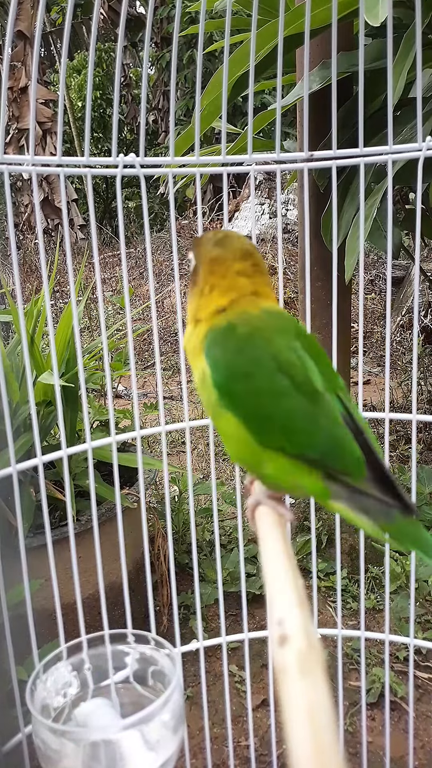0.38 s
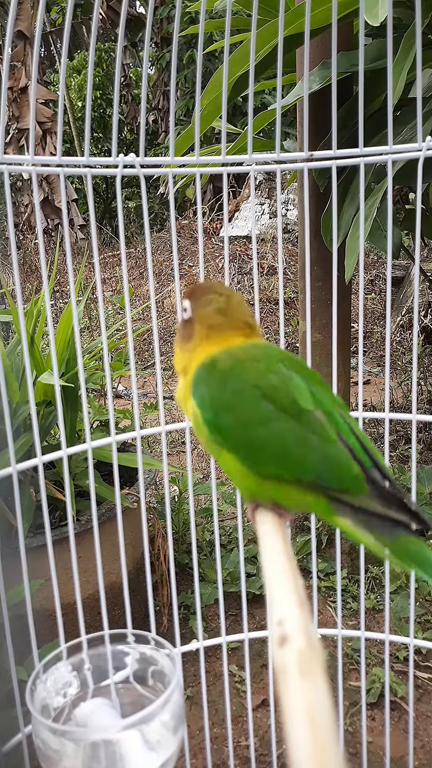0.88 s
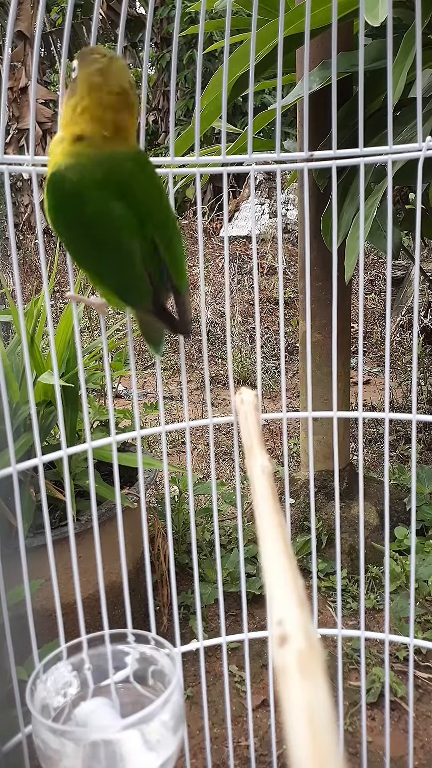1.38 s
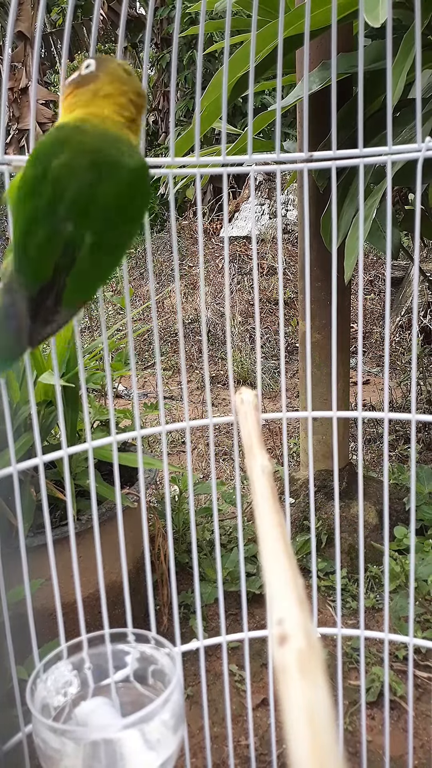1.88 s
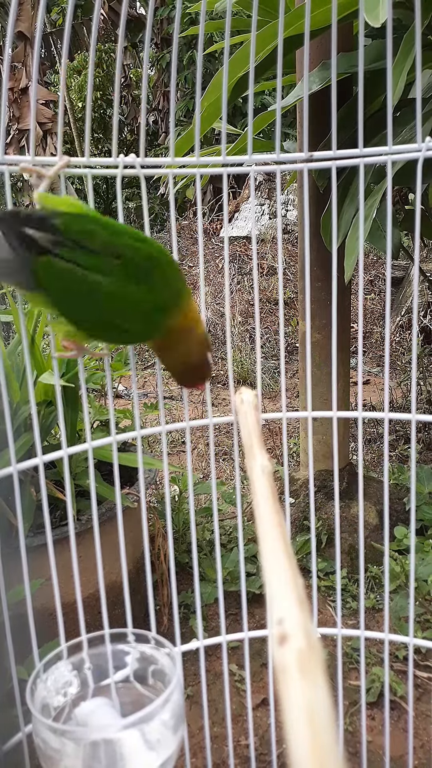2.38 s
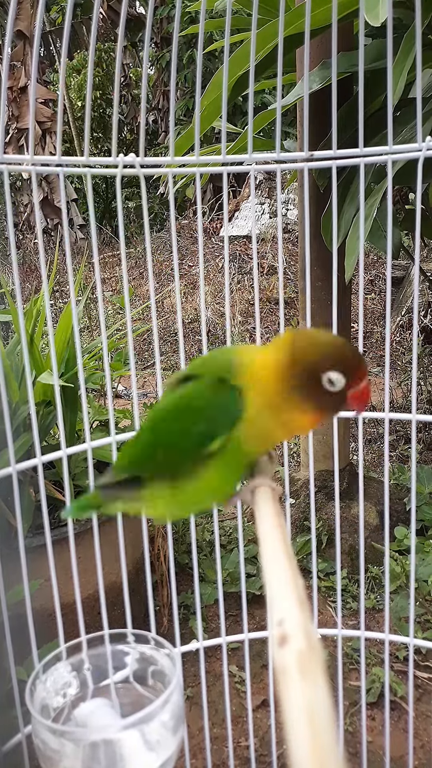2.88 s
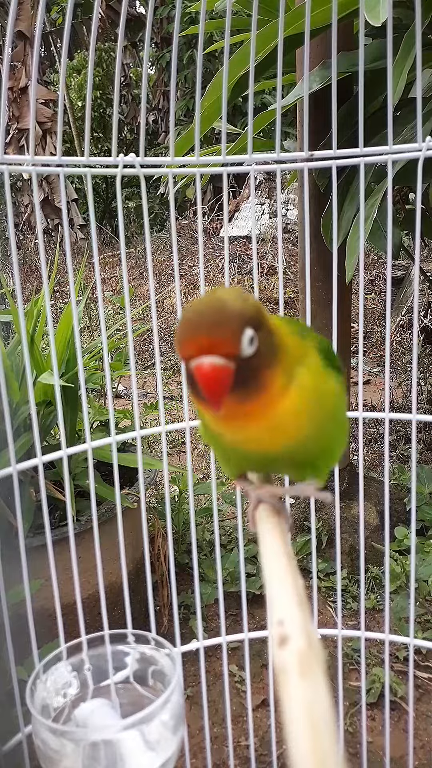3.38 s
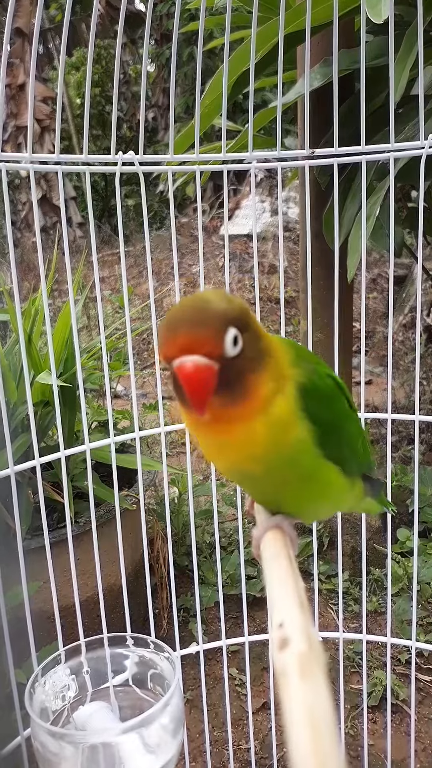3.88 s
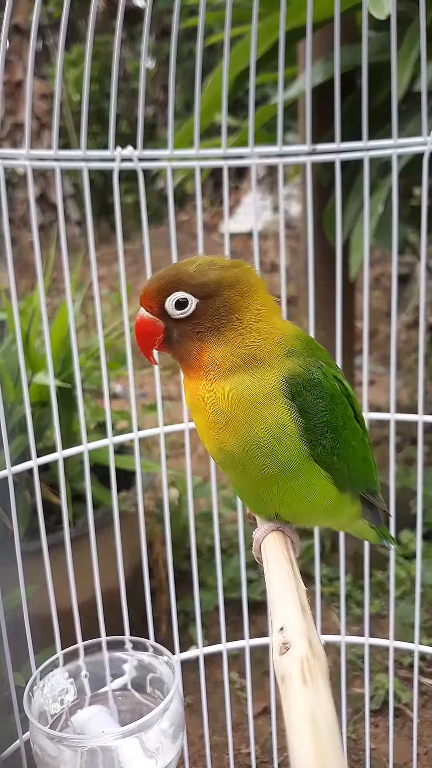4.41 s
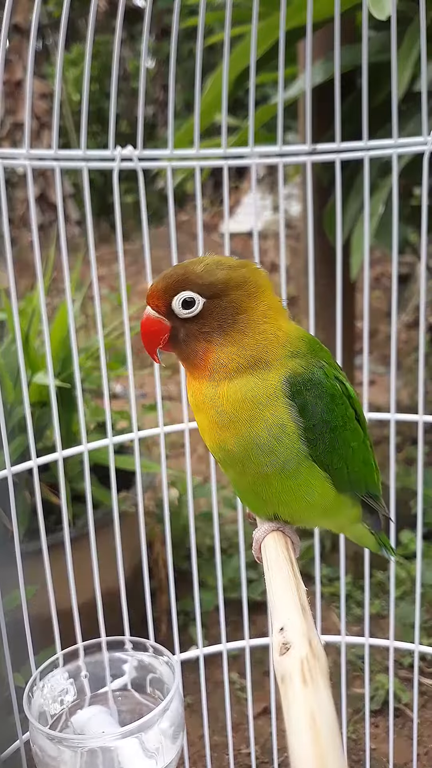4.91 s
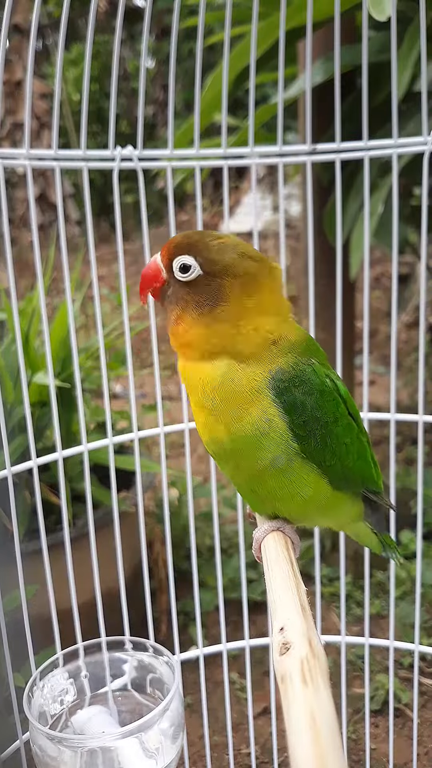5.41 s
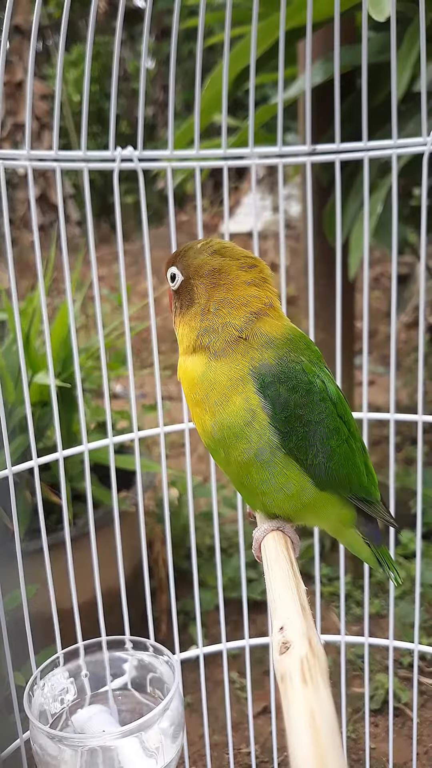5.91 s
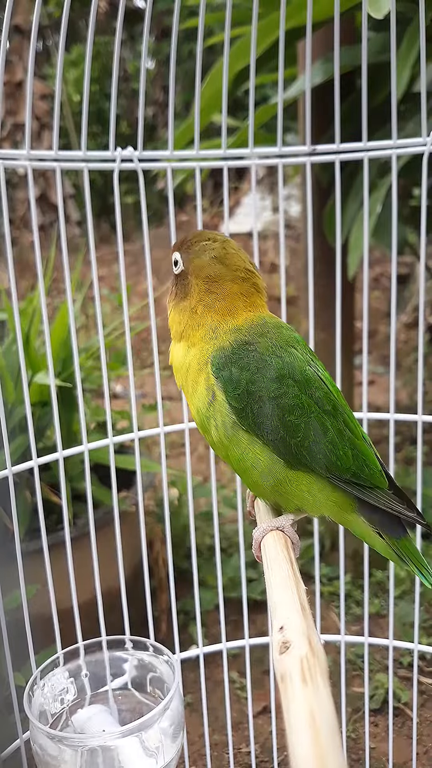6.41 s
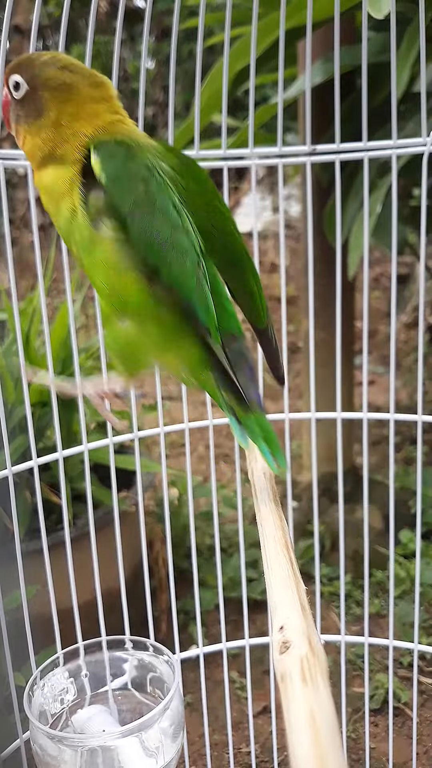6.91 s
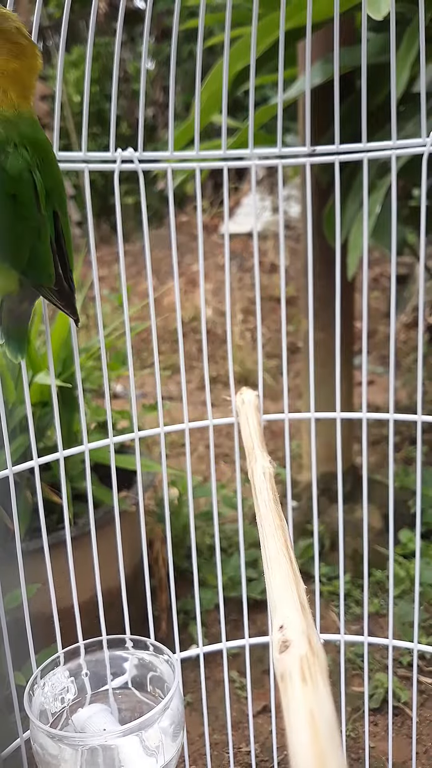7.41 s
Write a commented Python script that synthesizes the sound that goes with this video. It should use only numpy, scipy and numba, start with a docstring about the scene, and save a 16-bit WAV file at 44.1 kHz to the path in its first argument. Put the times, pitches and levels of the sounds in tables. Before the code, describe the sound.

An outdoor garden, heard through a close phone microphone: low rumble, soft leaf hiss, thin insect shimmer and faint, echoing distant birds run throughout, swelling at times. A slight claw scratch comes at 0.3 seconds. From 1.1 to 1.6 a nearby lovebird fires off loud, shrill, sliding chirps, some raspy, as its jump rattles the cage wire. Scrabbling and small metallic taps continue until about 2.3. At 2.8 a sharper scrape and wire clank lead into another quick chirp burst, ending near 3.3. Crisp, dry beak clicks snap irregularly from 3.6 to 4.5. Distant birds grow clearer around 4.8 to 5.3, and a faint low whistle wavers from 5 to 6. Piercing chirps return at 5.4, trailing into weaker, echoing notes until 5.9. After a quieter pause, a wire rattle and final shrill chirps burst out from 7.0 to 7.4.

```python
"""Rumble, leaf hiss, filtered-noise insects and far gliding sine whistles run throughout, swelling at times.
Claws scrabble from 0.26 s: noise bursts ring the cage wire. A near lovebird chirps from 1.1 s and 2.9 s
in gliding, rough partial stacks, with taps on the wire between. Beak clicks follow from 3.6 s: noise snaps
with a resonance. A low whistle wavers from 5 s; chirps return at 5.4 s and 7 s. The yard echoes the near
sounds; the close phone limits and clips the loudest."""
import sys
import numpy as np
from scipy import signal
from scipy.fft import rfft, irfft, next_fast_len
from scipy.io import wavfile
from scipy.ndimage import uniform_filter1d
from numba import njit

SR = 44100
rng = np.random.default_rng(int(sys.argv[2]) if len(sys.argv) > 2 else 0)


def invert_db(level):
    """Linear amplitude ratio for a level in decibels (20 dB per decade), elementwise."""
    return 10 ** (np.asarray(level, dtype=float) / 20)


def log_audio(samples):
    """Write samples as a 16-bit WAV file to the path given in sys.argv[1]."""
    # one column per channel
    frames = np.atleast_2d(samples).T
    # limit to full scale, then quantise
    limited = np.clip(frames, -1, 1)
    pcm = np.round(limited * 32767).astype(np.int16)
    wavfile.write(sys.argv[1], SR, pcm)


N = 332514

# Background swells: (time [s], rumble rms [dB], hiss and insect reference [dB])
SWELLS = [(0, -56, -71), (0.5, -54.5, -70), (1.09, -43.5, -59), (1.3, -46.5, -58), (1.62, -40, -59),
          (2.0, -39.5, -54), (2.3, -41, -59), (2.771, -35, -54.5), (3.029, -50, -66.5),
          (3.55, -45.5, -64.5), (4.1, -50.5, -64), (4.45, -41, -55), (5.39, -39, -54), (5.68, -50, -65.5),
          (6.5, -52.5, -69), (6.8, -50, -61.5), (6.97, -38, -54), (7.15, -47, -58.5), (7.5, -51, -64)]
# Rumble spectrum: (frequency [Hz], relative density [dB per Hz])
RUMBLE_SPECTRUM = [(15, -67.5), (25, -26.5), (97, 4.5), (197, -8.5), (249, -8), (287, -11.5), (700, -44.5),
                   (910, -54.5), (1540, -120)]
# Air hiss spectrum: (frequency [Hz], relative density [dB per Hz])
AIR_SPECTRUM = [(300, 1.5), (1300, -1.5), (2700, -7), (3100, 6.5), (5000, 4.5), (7000, 1.5), (9500, -12),
                (11300, -31.5), (13700, -8.5), (15600, -9)]
# Insect chorus bands: (centre [Hz], width [Hz], relative rms [dB])
INSECT_BANDS = [(3122, 170, 5.5), (6250, 87, -0.5), (12380, 1100, 1)]
# Far birds: (time [s], length [s], start pitch [Hz], end pitch [Hz], level ahead of direct/echo split [dB])
FAR_CHIRPS = [(0, 0.032, 6070, 5880, -45), (0.298, 0.071, 5670, 3860, -48), (0.332, 0.059, 4590, 4540, -51),
              (0.774, 0.14, 4590, 4740, -47.5), (1.926, 0.052, 4900, 4700, -43),
              (2.516, 0.093, 5660, 3930, -38.5), (3.456, 0.063, 4270, 4030, -46),
              (3.59, 0.12, 3960, 3930, -54), (3.55, 0.065, 5390, 6080, -49.5),
              (3.752, 0.058, 6250, 4250, -44.5), (3.864, 0.066, 7140, 6900, -50),
              (4.166, 0.048, 4300, 4290, -41.5), (4.431, 0.13, 6670, 3880, -38.5),
              (4.51, 0.037, 7100, 7100, -38.5), (4.834, 0.088, 4100, 4080, -34),
              (4.88, 0.075, 8660, 3940, -31.5), (5.097, .12, 8510, 3670, -33),
              (5.301, 0.091, 8250, 6170, -36), (6.157, 0.058, 5550, 3810, -42),
              (6.598, 0.11, 4430, 4750, -46.5), (6.66, 0.6, 6110, 6820, -43)]
# Far low whistles: (time [s], length [s], start level [dB], end level [dB])
FAR_WHISTLES = [(5.0, .45, -43.5, -46.5), (5.65, 0.39, -53, -70)]
# Whistle wavering: (rate [Hz], rms depth [dB])
WHISTLE_WAVER = (24, 3.5)
# Claws and wings on the bars: (time [s], length [s], scratch level [dB], relative bar drive [dB])
SCRABBLES = [(0.257, 0.049, -53.5, -67), (0.996, 0.057, -54.5, -56), (1.09, 0.079, -40, -34.5),
             (1.489, 0.14, -96.5, -35), (1.607, 0.12, -54, -43.5), (1.78, 0.1, -46, -40.5),
             (1.866, 0.1, -53.5, -40.5), (1.927, 0.057, -39.5, -51), (1.578, 0.56, -66, -48),
             (1.933, 0.42, -70, -57.5), (2.929, .45, -76, -49.5), (2.771, 0.11, -39.5, -54),
             (2.786, 0.069, -34.5, -49), (2.851, 0.042, -23.5, -54.5), (2.864, 0.054, -44, -25.5),
             (3.506, 0.023, -43.5, -68), (6.876, 0.035, -45, -60), (6.99, 0.058, -33, -33.5),
             (7.06, 0.19, -58.5, -52)]
# Cage bar resonances: (centre [Hz], width [Hz], gain [dB])
BAR_MODES = [(537, 22, 3.5), (860, 120, -8.5), (1070, 58, -13.5), (1360, 140, -14), (2050, 110, -14),
             (600, 340, -13)]
# Scratch resonances: (centre [Hz], width [Hz], relative gain [dB])
SCRATCH_MODES = [(3550, 670, 5.5), (5100, 550, 4), (7100, 940, 1), (7800, 730, -6), (14500, 4300, 0.5),
                 (5000, 6000, -13)]
# Single claw taps: (time [s], relative level [dB])
CLAW_TAPS = [(1.652, -42.5), (1.763, -41), (1.777, -42.5), (1.932, -41), (1.955, -45), (2.786, -42),
             (2.804, -28)]
# Wire modes under a tap: (frequency [Hz], relative mean level [dB], t60 [s])
WIRE_MODES = [(3600, -0.5, .05), (5200, -1.5, 0.051), (7300, -2, 0.045), (8300, -1.5, 0.058),
              (9200, -9, .04), (12200, -5, .06), (14900, -4, .04), (15300, -2.5, .06)]
# Beak clicks: (time [s], peak level [dB], added resonance [Hz])
BEAK_CLICKS = [(3.625, -29, 1990), (3.72, -8, 8500), (3.725, -17, 2500), (3.8154, -4.5, 4430),
               (3.9007, -11, 4160), (4.237, -6.5, 4200), (4.33, -1.5, 6640), (4.5157, -6, 2570)]
# Chirp notes, each a list of: (time [s], pitch [Hz], level of the stronger low partial before flutter [dB])
CHIRP_NOTES = [
    [(1.133, 5060, 9), (1.1355, 5434, -10.5), (1.139, 5320, -11)],
    [(1.139, 2328, 2), (1.143, 2796, -3), (1.147, 2843, -2.5), (1.151, 2880, 0), (1.156, 3190, -11)],
    [(1.219, 2172, -3.5), (1.2235, 2255, -12.5), (1.226, 2062, -22.5), (1.232, 2260, -1),
     (1.237, 2390, -14.5)],
    [(1.387, 3346, -10.5), (1.394, 4304, -16.5), (1.398, 5497, -16), (1.404, 6130, -17), (1.409, 5820, -5),
     (1.413, 4153, -5.5), (1.419, 3750, -11.5), (1.426, 3260, 4), (1.433, 3140, 0.5), (1.438, 4220, 8)],
    [(1.438, 4160, -8.5), (1.442, 3936, 1.5), (1.445, 6090, -11), (1.454, 5900, -7.5)],
    [(1.454, 5510, -5.5), (1.457, 4574, -6), (1.461, 4340, 7), (1.465, 4510, -27), (1.47, 4240, 3),
     (1.474, 4900, -4)],
    [(1.537, 2110, -25), (1.543, 2564, -35), (1.547, 2414, -21), (1.566, 1773, -22.5), (1.575, 1666, -18)],
    [(2.856, 3610, -18), (2.872, 2990, -33)],
    [(2.874, 2273, -9), (2.893, 2840, -16.5)],
    [(2.894, 3363, 2), (2.9, 3455, 0), (2.904, 4080, 1), (2.908, 5710, 1.5), (2.914, 6200, -4),
     (2.918, 3993, 2), (2.921, 3050, -5.5)],
    [(2.921, 2990, -4), (2.933, 2835, -6), (2.945, 2582, -11.5), (2.965, 2390, -4.5)],
    [(2.971, 3450, 1), (2.98, 3886, -1.5), (2.991, 3920, -3), (2.997, 4120, 0), (3.004, 4520, -9.5),
     (3.012, 4090, -5.5)],
    [(3.065, 1753, -23.5), (3.071, 1758, -16.5), (3.078, 3997, -6.5), (3.085, 4120, 3.5), (3.094, 3800, -2),
     (3.098, 3880, -16)],
    [(3.099, 6136, 0), (3.104, 5505, -3.5), (3.111, 4247, -1), (3.116, 4160, 1.5), (3.12, 4110, -14.5)],
    [(3.222, 2468, -23.5), (3.228, 2432, -15), (3.235, 2334, -18), (3.247, 1650, -12.5),
     (3.254, 1470, -18.5), (3.259, 1500, -27.5)],
    [(5.42, 2068, -6.5), (5.442, 3064, 4.5)],
    [(5.442, 3600, 1), (5.445, 3940, -2.5), (5.452, 3906, -5.5)],
    [(5.452, 2254, -13), (5.457, 2082, -4), (5.466, 2420, -1.5), (5.493, 2410, 1)],
    [(5.493, 2396, -2.5), (5.499, 6104, 2), (5.511, 6495, 5.5), (5.514, 5200, -1.5)],
    [(5.514, 5000, 6.5), (5.521, 3820, 3.5), (5.538, 3540, 0), (5.55, 3778, -2.5), (5.56, 3503, -7),
     (5.565, 2458, -7.5), (5.57, 2485, -17.5)],
    [(5.57, 2510, -9.5), (5.575, 3874, 0.5), (5.59, 4620, 8), (5.598, 4500, 1.5), (5.606, 5018, 0),
     (5.619, 5100, 0)],
    [(5.702, 2230, -26), (5.717, 2100, -24.5), (5.727, 2260, -17), (5.734, 2725, -22), (5.752, 2657, -19),
     (5.764, 2603, -16)],
    [(5.764, 3785, -13), (5.78, 3753, -24.5), (5.79, 3710, -14.5), (5.806, 3518, -18.5), (5.811, 2518, -16),
     (5.817, 3550, -21.5), (5.827, 3650, -17), (5.846, 4708, -15), (5.855, 4900, -13.5),
     (5.868, 4680, -13.5)],
    [(7.044, 3860, 0), (7.048, 4350, -3), (7.053, 5200, 7.5)],
    [(7.053, 5870, -3.5), (7.057, 6540, 4), (7.061, 6210, 4), (7.069, 5830, 7), (7.073, 5900, -22),
     (7.076, 5490, -3), (7.083, 5390, 1), (7.088, 5760, -9)],
    [(7.201, 2100, -35), (7.203, 2300, -25.5), (7.206, 2250, -40)],
    [(7.251, 1200, -19.5), (7.259, 1440, -23), (7.268, 1650, -24), (7.274, 1445, -11)],
    [(7.275, 2805, 1.5), (7.282, 2465, -20), (7.289, 2213, -6), (7.294, 2288, -6.5), (7.297, 3730, 0),
     (7.306, 5474, -11), (7.312, 5810, -14), (7.317, 5274, -8.5), (7.321, 4100, 4.5)],
    [(7.321, 4136, 3.5), (7.325, 2222, -27), (7.329, 1970, -14), (7.333, 2130, -13.5), (7.339, 4030, -5.5),
     (7.358, 4026, 5), (7.374, 3987, -5), (7.378, 3900, -7)],
]
# Colour of each note: (base roughness [0-1], brightness [dB], share thrown to the yard [dB]);
# more is thrown when the bird faces away
NOTE_COLOURS = [(.55, -17.5, -0.5), (0.7, 11.5, -2.5), (0.34, 11.5, 0.5), (0.1, -12.5, -4.5),
                (0.6, -11, -1), (0, -6, -0.5), (0.02, -17, -2), (1, 4, 11), (0.2, 11.5, 2), (0.1, 0.5, -6),
                (0.2, 3, -3), (.06, 1, 0), (0, 0.5, -9), (.05, 2, -2.5), (0.13, -12, -7), (.05, -6, 0.5),
                (0.8, -0.5, -1.5), (0, 0, -9.5), (0.1, 16, -7.5), (0.1, -4.5, -2), (.05, 0.5, -3.5),
                (0.37, 10.5, 8.5), (.3, -0.5, 10), (.75, -1, -3.5), (0.01, 8.5, -3), (.25, 0.5, 3),
                (0.5, 8.5, 7), (.08, -7, -4.5), (0.01, 2, -6)]
# Balance of the low partials before brightness: (pitch [Hz], second over first partial [dB])
SECOND_PARTIAL = [(1500, -0.5), (2200, 1.5), (3000, -10), (4000, -9.5), (5000, -26), (6200, -27.5)]
# Throat response on partials 3 and up: (frequency [Hz], gain [dB])
THROAT_RESPONSE = [(5000, -8), (8000, 1.5), (9500, -16.5), (11000, -14), (12500, -10), (15000, -13)]
# Breath spectrum: (frequency [Hz], relative density [dB per Hz])
BREATH_SPECTRUM = [(1600, -25.5), (2600, -3.5), (5000, 4.5), (8300, 2.5), (9800, -22.5), (11500, -10),
                   (13000, -3.5), (15500, -17)]
# Small beak radiates little bass: (frequency [Hz], gain [dB])
BEAK_RESPONSE = [(900, -25), (1500, 1), (2000, 0.5)]
# Yard echoes of the near sounds: (t60 [s], level [dB])
YARD_ECHOES = [(.06, -7), (0.3, -11), (.9, -35)]

TOP_HZ = 15700
FAR_WARBLE_SCALE, FAR_DIRECT_DB, FAR_T60_S = 0.011, -13, 0.6
WHISTLE_HZ = 1390
PARTIAL_STEP_DB, RASP_HZ = -4, 909
BREATH_BASE_DB = -19.5  # before scaling by roughness
JITTER_PER_ROUGHNESS, JITTER_HZ = 0.05, 513.5
FLUTTER_DB, FLUTTER_HZ = 3, 149
ROUGH_S_PER_OCTAVE = 0.0015
YARD_GAP_S, CAGE_ECHO_DB = 0.0019, -6
LIMIT, RELEASE_S = 1.051, 0.03


def level(x, db):
    """Scale to an rms level."""
    return x * invert_db(db) / np.sqrt(np.mean(x ** 2))


def colour(x, points):
    """Filter by (frequency [Hz], gain [dB]) points on a log axis."""
    hz, db = np.transpose(points)
    size = next_fast_len(len(x))
    f = np.maximum(np.arange(size // 2 + 1) * SR / size, 1)
    gain = invert_db(np.interp(np.log(f), np.log(hz), db))
    return irfft(rfft(x, size) * gain, size)[:len(x)]


def ring(x, modes):
    """Sum of (centre [Hz], width [Hz], gain [dB]) resonances."""
    return sum(invert_db(db) * signal.lfilter(*signal.iirpeak(hz, hz / width, fs=SR), x)
               for hz, width, db in modes)


def walk(rate_hz):
    """Smooth random wander of rms 1: noise averaged twice over 1/rate."""
    k = int(SR / rate_hz)
    return level(uniform_filter1d(uniform_filter1d(rng.standard_normal(N), k), k), 0)


def echo(x, t60_s, gap_s):
    """Dense random reflections of unit energy, decaying exponentially, starting after a gap."""
    t = np.arange(int(t60_s * SR)) / SR
    tail = rng.standard_normal(len(t)) * np.exp(-np.log(1000) * t / t60_s) * (t > gap_s)
    return signal.fftconvolve(x, tail / np.sqrt(np.sum(tail ** 2)))[:N]


def add(out, s, x):
    """Mix x in at time s."""
    i = int(s * SR)
    out[i:i + len(x)] += x[:N - i]


def background():
    """Shaped noise for rumble, air and leaf hiss, narrow noise bands for insects; each wavers a little."""
    s, *columns = np.transpose(SWELLS)
    low_db, high_db = (np.interp(np.arange(N) / SR, s, c) for c in columns)
    rumble = level(colour(rng.standard_normal(N), RUMBLE_SPECTRUM), 0)
    rumble *= invert_db(low_db + 1.0 * walk(2.3))
    air = level(colour(rng.standard_normal(N), AIR_SPECTRUM), 10.7)
    air *= invert_db(high_db + 1.1 * walk(5.0))
    leaf_spectrum = [(250, -1.5), (500, 2.0), (1500, -5.0), (2600, -15.5), (4000, -43.0)]
    leaves = level(colour(rng.standard_normal(N), leaf_spectrum), -10.5)
    insects = np.zeros(N)
    for band in INSECT_BANDS:
        chorus = ring(ring(rng.standard_normal(N), [band]), [band])
        insects += level(chorus, band[2]) * invert_db(0.8 * walk(15))
    leaves *= invert_db((low_db + high_db) / 2 + 1.2 * walk(9.9))
    return rumble + air + leaves + insects * invert_db(high_db - 1.5)


def far_birds():
    """Thin unsteady gliding sines, mostly heard through their echoes."""
    out, warble, sway = np.zeros(N), walk(350), walk(33)
    for s, length_s, start_hz, end_hz, db in FAR_CHIRPS:
        i, glide = int(s * SR), np.geomspace(start_hz, end_hz, int(length_s * SR))
        # gliding chirps warble more than held notes
        depth = FAR_WARBLE_SCALE * (1.2 + 4 * abs(np.log(end_hz / start_hz)))
        hz = glide * (1 + depth * warble[i:i + len(glide)])
        shape = signal.windows.tukey(len(hz), 0.5) * invert_db(db + 2.5 * sway[i:i + len(hz)])
        add(out, s, shape * np.sin(2 * np.pi * np.cumsum(hz) / SR))
    return invert_db(FAR_DIRECT_DB) * out + echo(out, FAR_T60_S, 0.0014)


def whistle():
    """A near-pure tone whose strength wavers over the distance."""
    hz = WHISTLE_HZ * (1 + 0.0023 * walk(30))
    waver_hz, waver_db = WHISTLE_WAVER
    tone = np.sin(2 * np.pi * np.cumsum(hz) / SR) * invert_db(waver_db * walk(waver_hz))
    out = np.zeros(N)
    for s, length_s, start_db, end_db in FAR_WHISTLES:
        i, n = int(s * SR), int(length_s * SR)
        shape = invert_db(np.linspace(start_db, end_db, n)) * signal.windows.tukey(n, 0.2)
        add(out, s, tone[i:i + n] * shape)
    return out


def cage():
    """Bursts of uneven scrabbling noise that also ring the bars."""
    grit = level(rng.standard_normal(N) * invert_db(3 * walk(400) + 2.5 * walk(40)), 0)
    scratch = level(ring(grit, SCRATCH_MODES), 0)
    out, drive = np.zeros(N), np.zeros(N)
    for s, length_s, scratch_db, drive_db in SCRABBLES:
        i, shape = int(s * SR), signal.windows.tukey(int(length_s * SR), 0.4)
        add(out, s, invert_db(scratch_db) * shape * scratch[i:i + len(shape)])
        add(drive, s, invert_db(drive_db) * shape * grit[i:i + len(shape)])
    return out + invert_db(19) * ring(drive, BAR_MODES)


def taps():
    """A short scrape sets the wire's high modes ringing, differently each time."""
    out, t = np.zeros(N), np.arange(4000) / SR
    for s, db in CLAW_TAPS:
        scrape = rng.standard_normal(len(t)) * np.exp(-t / 0.004)
        modes = np.zeros(len(t))
        for hz, mode_db, t60_s in WIRE_MODES:
            decay = np.exp(-np.log(1000) * t / t60_s)
            modes += invert_db(mode_db + 6.8 * rng.standard_normal()) * np.sin(2 * np.pi * hz * t) * decay
        ringing = level(signal.fftconvolve(scrape, modes)[:len(t)], -5.5)
        add(out, s, invert_db(db) * (0.35 * np.diff(scrape, prepend=0) + ringing))
    return out


def beak():
    """Each click is a sharp noise snap with a softer rebound, ringing briefly."""
    out, t = np.zeros(N), (np.arange(800) - 200) / SR
    snap_response = [(600, -24), (1400, 0.5), (9000, -5), (10500, -18), (15500, -7)]
    for s, db, hz in BEAK_CLICKS:
        strike = (t > 0) * np.exp(-np.abs(t) / 0.00017)
        rebound = 0.094 * (t > 0.0011) * np.exp(-np.abs(t - 0.0011) / 0.0016)
        snap = colour(rng.standard_normal(len(t)) * (strike + rebound), snap_response)
        snap = snap + ring(snap, [(hz, 1200, 3)])
        add(out, s + t[0], invert_db(db) * snap / np.abs(snap).max())
    return out


def lovebird():
    """The syrinx sings a gliding stack of partials; uneven vibration spreads each into sidebands."""
    out, thrown = np.zeros(N), np.zeros(N)
    rasp = walk(RASP_HZ) + 1j * walk(RASP_HZ)
    breath = colour(rng.standard_normal(N), BREATH_SPECTRUM)
    shake = walk(JITTER_HZ)
    flutter_db = FLUTTER_DB * np.array([walk(FLUTTER_HZ) for _ in range(8)])  # each partial flutters alone
    throat_hz, throat_db = np.transpose(THROAT_RESPONSE)
    for note, (rough, bright_db, echo_db) in zip(CHIRP_NOTES, NOTE_COLOURS):
        s, *columns = np.transpose(note)
        t = np.arange(s[0], s[-1], 1 / SR)
        hz, db = (uniform_filter1d(np.interp(t, s, c), 60) for c in columns)
        i = int(s[0] * SR)
        span = slice(i, i + len(t))
        # the second partial mostly weakens as pitch rises
        over_db = bright_db + np.interp(hz, *np.transpose(SECOND_PARTIAL))
        first_db, second_db = db + np.minimum(0, [-over_db, over_db]) + flutter_db[:2, span]
        # quick pitch jumps turn rough
        glide_octaves_per_s = np.abs(np.gradient(np.log2(hz), t))
        rough = np.clip(rough + ROUGH_S_PER_OCTAVE * glide_octaves_per_s, 0, 1)
        # a rough voice also shakes in pitch
        jitter = JITTER_PER_ROUGHNESS * (0.12 + rough) * shake[span]
        phase = 2 * np.pi * np.cumsum(hz * (1 + jitter)) / SR
        stack = invert_db(first_db) * np.exp(1j * phase)
        for k in range(2, 8):
            upper_db = second_db
            if k > 2:
                throat = np.interp(k * hz, throat_hz, throat_db)
                upper_db = second_db + (k - 2) * PARTIAL_STEP_DB + throat + 1.4 * flutter_db[k, span]
            stack += (k * hz < TOP_HZ) * invert_db(upper_db) * np.exp(1j * k * phase)
        vibration = np.sqrt(1 - rough ** 2) + rough * rasp[span] / np.sqrt(2)
        voice = np.sqrt(2) * np.real(stack * vibration)
        voice += invert_db(db + BREATH_BASE_DB) * (0.24 + 7 * rough) * breath[span]
        voice *= np.clip(np.minimum((t - s[0]) / 0.0011, (s[-1] - t) / 0.0015), 0, 1)
        add(out, s[0], voice)
        add(thrown, s[0], invert_db(echo_db) * voice)
    return colour(out, BEAK_RESPONSE), colour(thrown, BEAK_RESPONSE)


def yard_echo(near):
    """Decaying random reflections at several t60s, duller at both ends of the range."""
    yard = sum(invert_db(db) * echo(near, t60_s, YARD_GAP_S) for t60_s, db in YARD_ECHOES)
    return colour(yard, [(1500, -7), (3000, -2.5), (6000, -0.5), (9000, -3.0), (13000, -5.0)])


def scene():
    """The near bird and its cage, their echoes, and the garden."""
    voice, thrown = lovebird()
    clatter = cage() + taps() + beak()
    yard = yard_echo(thrown + invert_db(CAGE_ECHO_DB) * clatter)
    return (voice + clatter + yard + far_birds() + whistle() + background())[None]


@njit
def limiter(x, top, release):
    """Gain drops at once on a peak and recovers gradually."""
    y, envelope = np.empty(len(x)), 0.
    for i in range(len(x)):
        envelope = max(abs(x[i]), envelope * release)
        y[i] = x[i] * min(1., top / (envelope + 1e-9))
    return y


def top_cut(x):
    """Nothing passes above the cut-off."""
    return signal.sosfilt(signal.butter(12, 16400, fs=SR, output="sos"), x)


def record(dry):
    """The phone limits and clips the loudest notes, and cuts both ends of the range."""
    x = limiter(dry[0], LIMIT, np.exp(-1 / (RELEASE_S * SR)))
    x = np.clip(x, -0.97, 0.97)
    x = signal.sosfilt(signal.butter(2, 45, "high", fs=SR, output="sos"), x)
    x = signal.sosfilt(signal.ellip(8, 0.2, 40, TOP_HZ, fs=SR, output="sos"), x)
    return top_cut(x[None])


dry = scene()
out = record(dry)
log_audio(out)
```